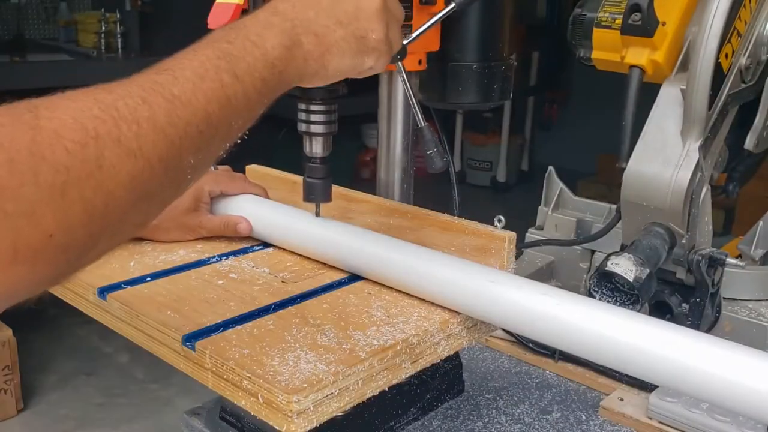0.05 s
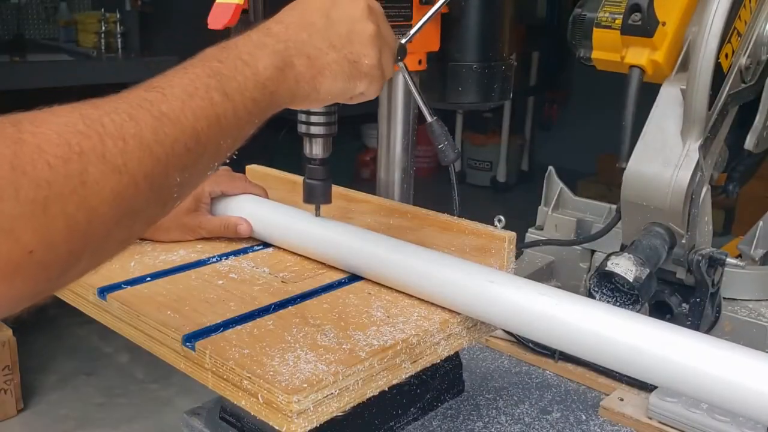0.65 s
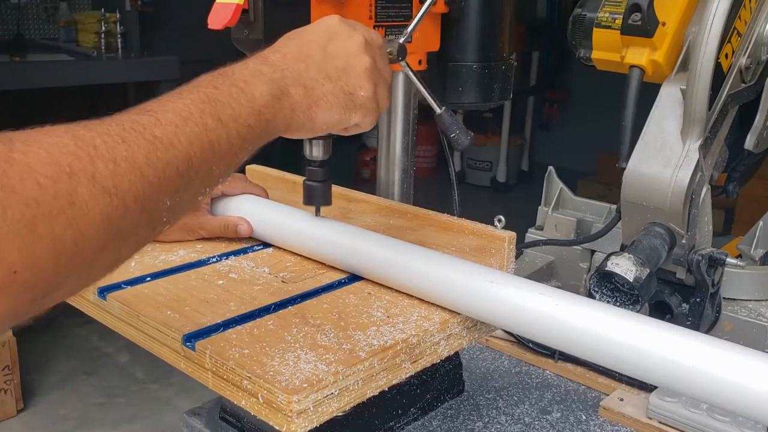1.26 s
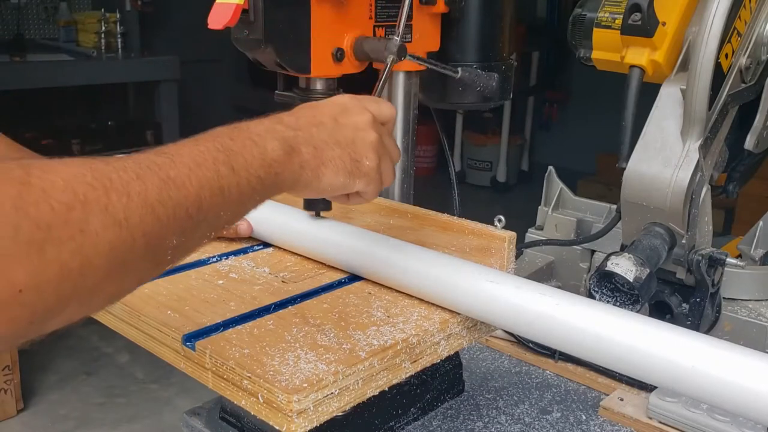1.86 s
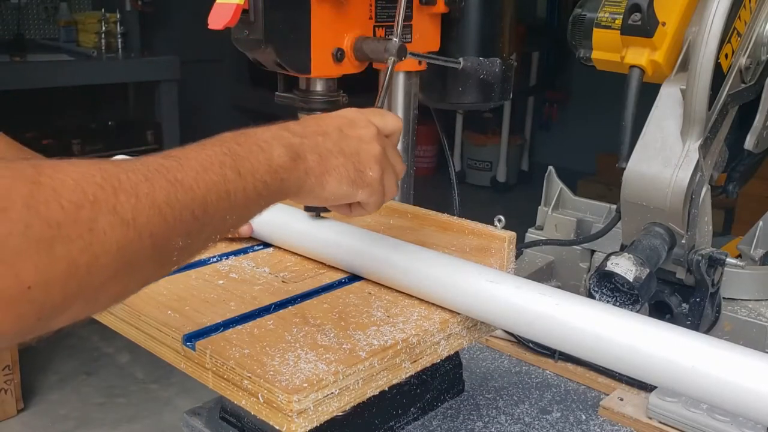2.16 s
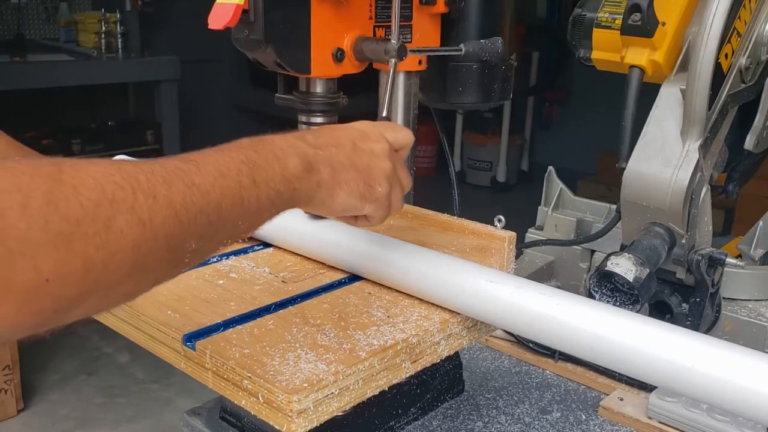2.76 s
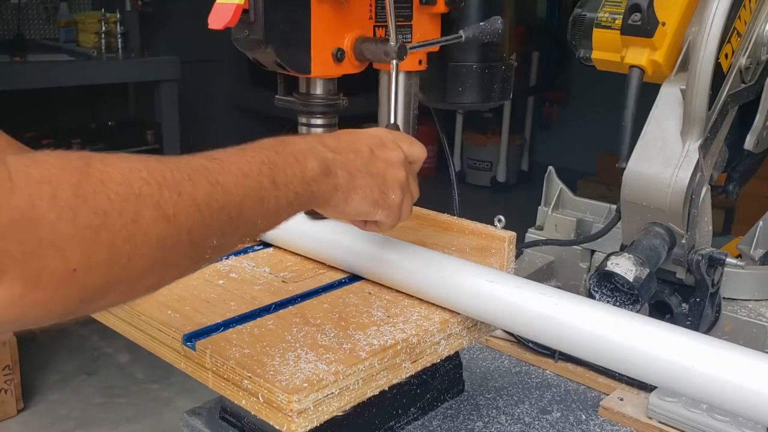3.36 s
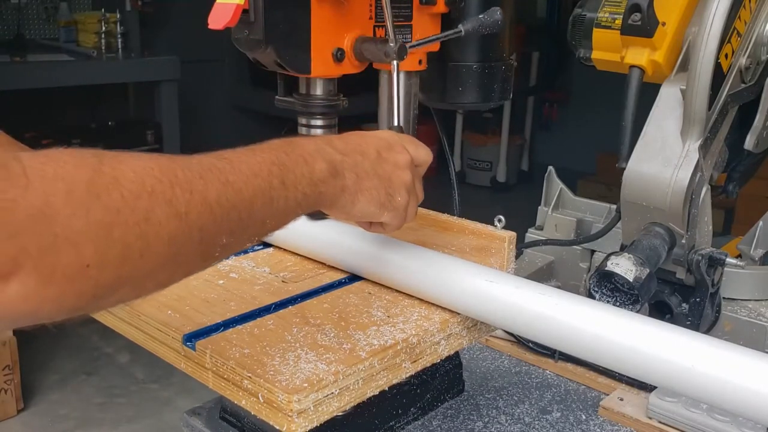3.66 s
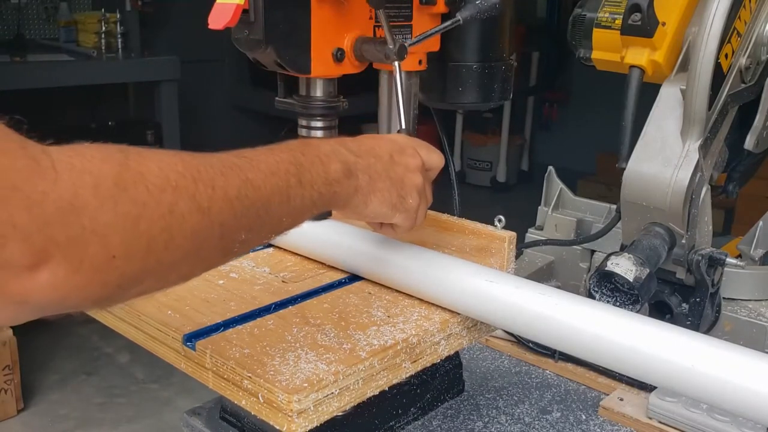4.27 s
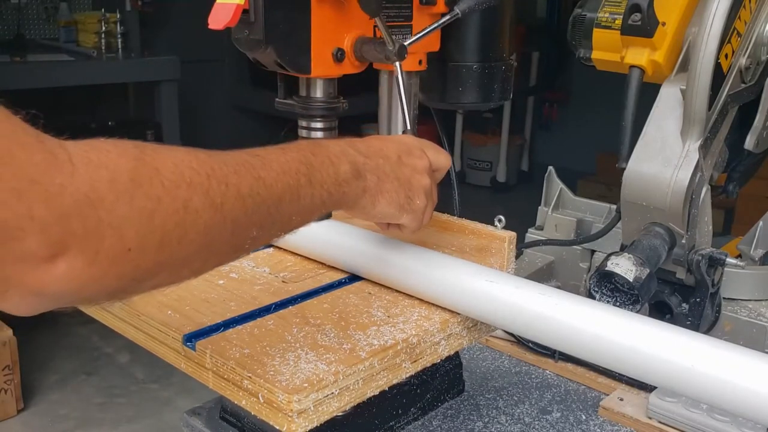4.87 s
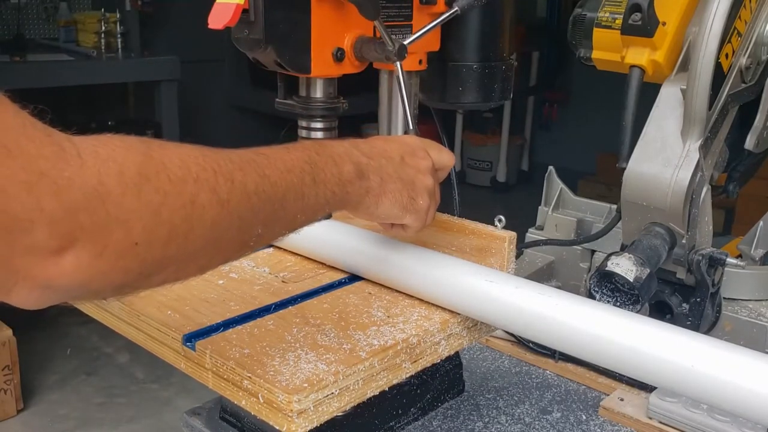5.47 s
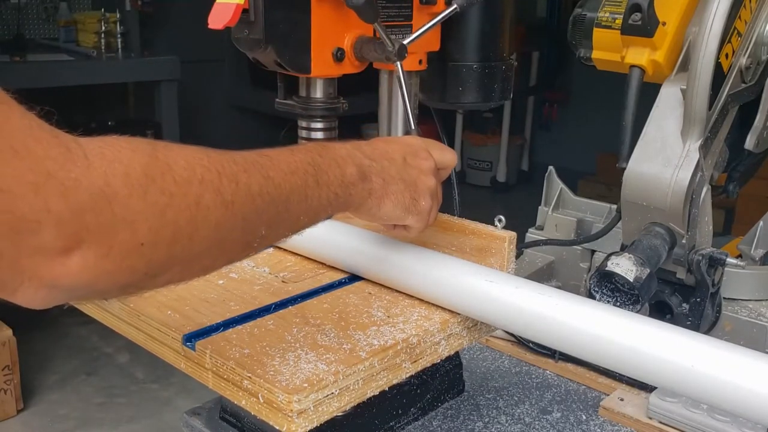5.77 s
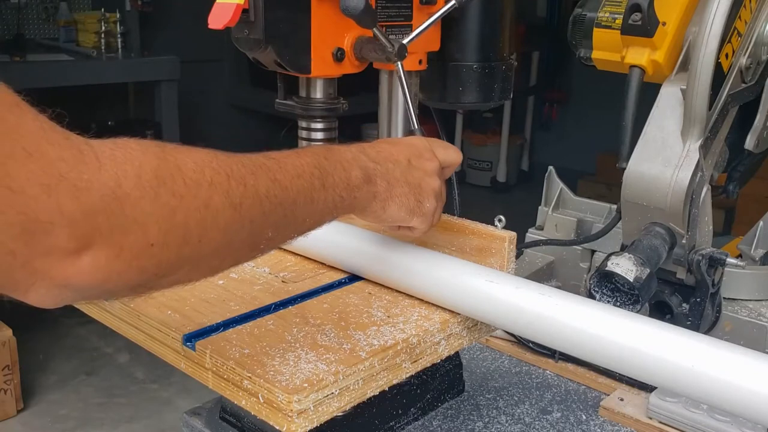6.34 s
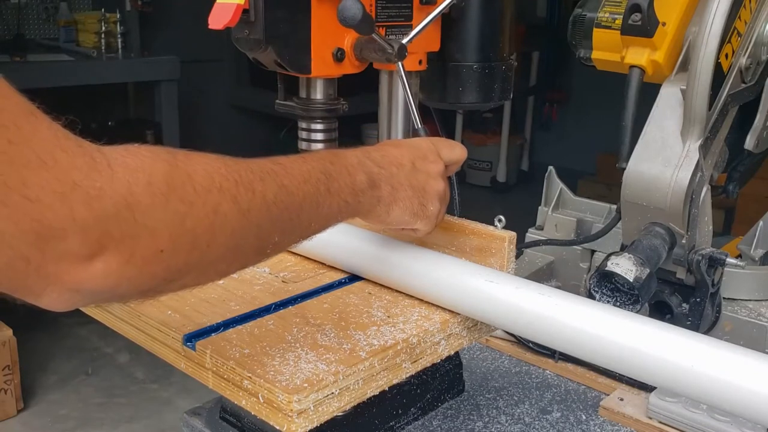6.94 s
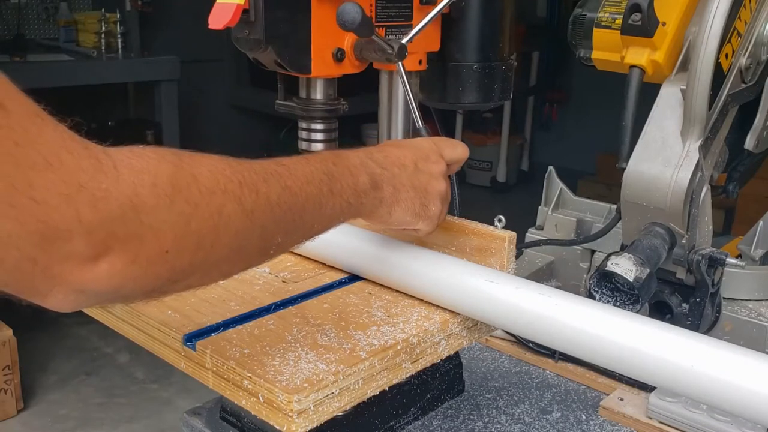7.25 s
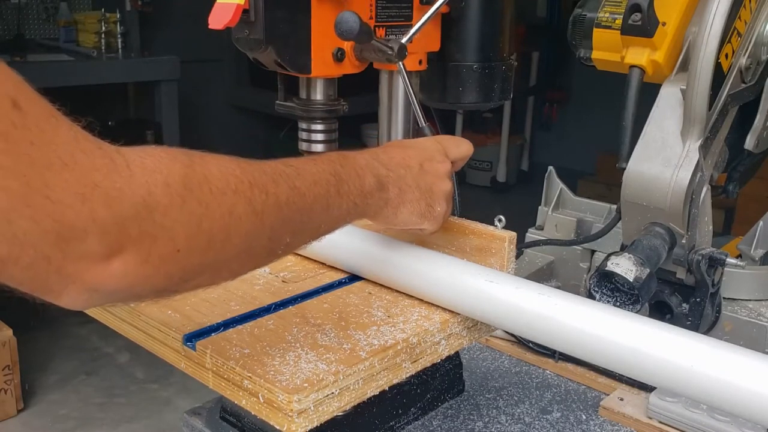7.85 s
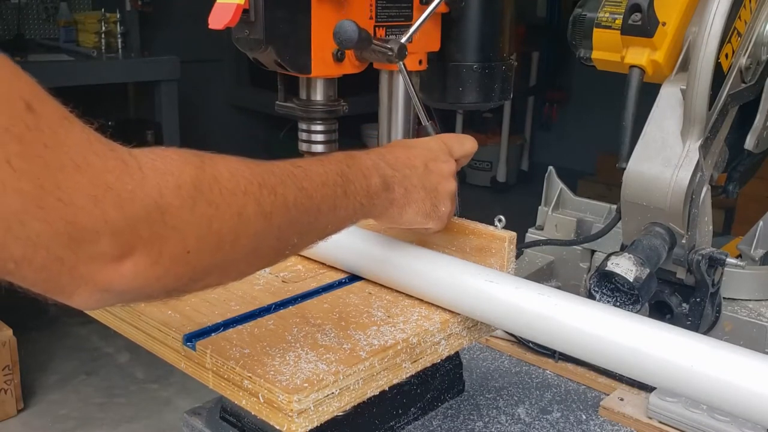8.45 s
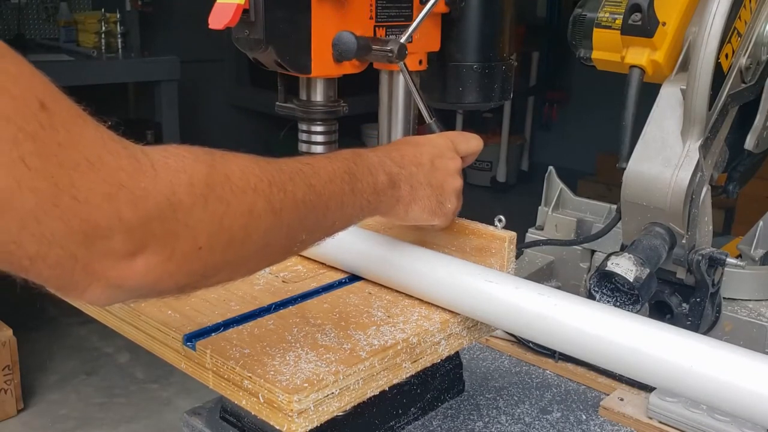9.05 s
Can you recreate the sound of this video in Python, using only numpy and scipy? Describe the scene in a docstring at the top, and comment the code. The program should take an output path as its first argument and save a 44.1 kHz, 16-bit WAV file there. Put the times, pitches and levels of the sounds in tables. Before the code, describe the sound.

A drill press hums and rattles, then a hole saw bites into plastic pipe with a loud, hollow, ringing rasp.

```python
"""Drill press and hole saw on plastic pipe.

A belt-driven drill press hums and throbs in a small workshop. Torque pulses rattle the quill as it
is fed down, and the splines tick as the spindle extends. Then a hole saw bites into a plastic pipe:
its teeth chip the wall turn after turn, the pipe resounds and the steel cup rings."""
import sys
import numpy as np
from scipy import signal
from scipy.fft import rfft, irfft, next_fast_len
from scipy.io import wavfile
from scipy.ndimage import uniform_filter1d, map_coordinates

SR = 44100
rng = np.random.default_rng(int(sys.argv[2]) if len(sys.argv) > 2 else 0)


def digitize_waveform(pressure):
    """Quantize a signal to 16-bit integers and store it at the path in sys.argv[1].

    Rows of a 2-D input are taken as channels; values are limited to [-1, 1].
    """
    field = np.atleast_2d(pressure).T
    bounded = np.clip(field, -1, 1)
    quanta = np.round(bounded * 32767).astype(np.int16)
    wavfile.write(sys.argv[1], SR, quanta)


N = 401751
TIME = np.arange(N) / SR
PULSE_HZ = 119.985  # motor torque pulses
EXTEND_S = 1.43  # spindle starts to extend
TOUCH_S, CLAMP_ATTACK_S = 4.504, 0.58  # saw lands, clamping the frame
DEEPEN_S, DEEPEN_LENGTH_S = 6.2, 2.16  # deepening kerf loads the drive


# uneven teeth: place/turns, then level/dB of wall thump, cup ring, shallow chip, deep chip, scoring
TEETH = [(0.025, -2.0, -18.0, -7.0, -4.0, -11.0), (0.1, -8.0, -11.0, -10.0, -4.0, -10.0),
         (0.205, -7.0, -1.0, -4.0, -6.0, -0.0), (0.23, -10.0, -7.0, -5.0, -4.0, -2.0),
         (0.28, -6.0, -7.0, -7.0, -4.0, -11.0), (0.355, -10.0, -4.0, -10.0, -4.0, -10.0),
         (0.445, -5.0, -1.0, -3.0, -3.0, -6.0), (0.47, -18.0, -1.0, 0.0, -6.0, -1.0),
         (0.485, 0.0, -18.0, -18.0, -5.0, -18.0), (0.56, -10.0, -12.0, -5.0, -4.0, -9.0),
         (0.705, -6.0, -1.0, -1.0, -1.0, 0.0), (0.77, -14.0, -2.0, -4.0, -2.0, -6.0),
         (0.84, -16.0, -11.0, -9.0, 0.0, -17.0), (0.93, -1.0, -2.0, -4.0, -2.0, -2.0),
         (0.975, -18.0, 0.0, -0.0, -3.0, -9.0), (0.99, -12.0, -1.0, -10.0, -4.0, -9.0)]
# chip spectra, shallow and deep kerf: f/Hz, level/dB
CHIPS_SHALLOW = [(100, -33), (1500, -10), (2500, -2), (3200, 0.5), (5000, 3.5), (6500, 1.5), (8000, 1.5),
                 (9000, 8), (10500, -4.5), (11400, -4), (13000, -27), (15800, -13)]
CHIPS_DEEP = [(100, -35), (1500, 0), (2500, -2.5), (3200, -14.5), (5000, -2), (6500, 0), (8000, 2),
              (9000, 6), (10500, -4.5), (11400, -1), (13000, -25), (15800, -8)]
# tooth-point spectrum: f/Hz, level/dB
SCRATCH = [(4000, -29), (7500, -9), (8500, 17), (9500, 4), (11000, 9), (12500, -3), (13700, 0), (15800, 6)]
# singing mode of the cup: f/Hz, width/Hz, level/dB
CUP_NOTE = [(9566, 55, 0)]
# cup rubbing in the kerf: t/s, level/dB
BIND = [(8.25, -44), (8.42, -33), (8.63, -29), (8.69, -69), (8.8, -37), (8.93, -36), (9.11, -34)]
# modes of the rubbed cup: f/Hz, width/Hz, level/dB
SHRILL_MODES = [(4130, 130, -9), (4600, 300, -13), (8470, 110, -1), (8860, 140, 0), (9250, 220, -6),
                (9600, 200, -5), (11400, 500, -12)]

def hole_saw(chip_db=-30, steel_db=-32, sing_db=-41, score_db=-33, bind_db=0.5, score_decay_s=0.43):
    """Each tooth snaps off a chip and tears on briefly, ringing the saw's steel cup."""
    deep = ramp(6.06, 0.9)
    _, _, cup_db, shallow_db, deep_db, point_db = np.transpose(TEETH)
    chips = np.sqrt(1 - deep) * coloured(scrape(shallow_db, drag=0.42), CHIPS_SHALLOW)
    chips += np.sqrt(deep) * coloured(scrape(deep_db, drag=0.84), CHIPS_DEEP)
    force = scrape(cup_db, drag=0.48)
    steel = amp(steel_db + deep - 3 * ramp(7.6, 0.98)) * cup_ring(force, deep)
    rasp = ramp(4.5, 0.59) * (amp(chip_db - 2.5 * deep) * chips + steel)
    # the cup sings until the kerf walls hold it
    singing = ramp(TOUCH_S, CLAMP_ATTACK_S) * amp(sing_db - 9 * deep + wobble(6.9))
    note = singing * resonate(force, CUP_NOTE)
    scoring = ramp(4.68, 0.09) * np.exp(-np.maximum(TIME - 4.815, 0) / score_decay_s)
    scratch = amp(score_db) * scoring * coloured(scrape(point_db, drag=0.1, life_s=0.001), SCRATCH)
    binding = during(BIND) * amp(bind_db + curves(BIND)[0])
    shrill = binding * resonate(scrape(deep_db, drag=0.45), SHRILL_MODES)
    return rasp + note + scratch + shrill


# cup modes by kerf depth: shallow f/Hz, deep f/Hz, width/Hz, shallow level/dB, deep level/dB
CUP_MODES = [(3310, 3310, 60, -8, -24), (3760, 3770, 100, -2, -11), (3988, 3983, 130, -1, -6),
             (4140, 4170, 170, -6, 0), (4560, 4560, 230, -9, -2), (4705, 4760, 120, 0, -5),
             (5480, 5420, 170, -14, -12), (7080, 7060, 120, -14, -8), (8590, 8530, 200, -5, 0),
             (8770, 8810, 170, -2, -7), (9560, 9600, 140, -20, -8), (11200, 11330, 250, -22, -12),
             (11980, 11980, 100, -15, -22)]

def cup_ring(force, depth, drift=0.11, drift_hz=5):
    """The steel's ring shifts as the kerf grips and frees it."""
    shallow_hz, deep_hz, width_hz, shallow_db, deep_db = np.transpose(CUP_MODES)
    grip = np.clip(depth + drift * wobble(drift_hz), 0, 1)
    free = resonate(force, zip(shallow_hz, width_hz, shallow_db))
    held = resonate(force, zip(deep_hz, width_hz, deep_db))
    return unit((1 - grip) * free + grip * held)


def scrape(bite_db, drag, life_s=0.0023):
    """Noise swells as each tooth sinks in, over the steady drag of the others."""
    tearing = dying(tooth_blows(bite_db, uneven_db=0.2), life_s)
    bites = unit(uniform_filter1d(tearing, size=SR // 700))
    return unit(np.hypot(bites, drag) * rng.standard_normal(N))


def tooth_blows(bite_db, uneven_db, scatter_turns=0.006):
    """One impulse per tooth per turn, scattered in place and strength."""
    turns = spindle_turns()
    place = np.arange(int(turns[-1]) + 1)[:, None] + np.transpose(TEETH)[0]
    place += scatter_turns * rng.standard_normal(place.shape)
    at = np.minimum(np.searchsorted(turns, place), N - 1)
    sizes = amp(bite_db + uneven_db * rng.standard_normal(at.shape))
    # the teeth of each turn share the feed force
    sizes = sizes / np.linalg.norm(sizes, axis=1, keepdims=True) * (at < N - 1)
    return np.bincount(at.ravel(), sizes.ravel(), N)


def spindle_turns(idle_hz=25.021, sag_from_s=4.91, sag_hz_per_s=0.094, max_sag_hz=0.315):
    """Running turn count; the speed sags under load."""
    return np.cumsum(idle_hz - np.clip(sag_hz_per_s * (TIME - sag_from_s), 0, max_sag_hz)) / SR


# pipe modes: whole f/Hz, cut f/Hz, width/Hz, then level/dB at first bite, grooved, nearly cut
WALL_MODES = [(384, 380, 45, -14, -12, -18), (489, 485, 47, -11, -7, -9), (548, 542, 53, -13, -15, -26),
              (720, 720, 70, -20, -10, -18), (855, 850, 110, -13, -14, -15), (1010, 1028, 55, -3, -3, -4),
              (1110, 1090, 80, -6, -9, -22), (1186, 1172, 50, -4, -7, -4), (1290, 1290, 70, -11, -13, -14),
              (1360, 1375, 48, -2, -4, -8), (1610, 1590, 60, -13, -8, -9), (1660, 1655, 45, -16, -15, -7),
              (1865, 1855, 55, -13, -15, -18), (2070, 2090, 70, -21, -22, -21),
              (2350, 2360, 70, -18, -21, -20)]
# wall sound under hand pressure: t/s, level/dB
PRESSURE = [(4.58, -26), (4.71, -26.5), (5.1, -28), (5.22, -27.5), (5.35, -29), (5.46, -28), (5.64, -27.5),
            (5.78, -29.5), (6.16, -29), (6.22, -27.5), (6.52, -27.5), (6.65, -29.5), (7.5, -30),
            (8.4, -32.5), (8.69, -31.5), (8.82, -32.5), (9.11, -31.5)]

def pipe_wall(pipe_db=0.5):
    """Teeth thump the hollow pipe: it howls at first, and its ring shifts as the wall thins."""
    press_db, = curves(PRESSURE)
    grooved, thin = ramp(5.05, 0.47), ramp(6.2, 1.95)
    blows = tooth_blows(np.transpose(TEETH)[1], uneven_db=-0.6, scatter_turns=0.009)
    tearing = unit(dying(blows, life_s=0.0014))
    force = 0.38 * unit(blows) + unit(np.hypot(tearing, 0.5) * grit(0.5))
    whole_hz, cut_hz, width_hz, first_db, grooved_db, cut_db = np.transpose(WALL_MODES)
    stages = [(1 - grooved, whole_hz, first_db),
              (grooved * (1 - thin), whole_hz, grooved_db),
              (thin, cut_hz, cut_db)]
    wall = sum(share * resonate(force, zip(hz, width_hz, db)) for share, hz, db in stages)
    wall /= np.sqrt(np.abs(uniform_filter1d(wall ** 2, SR // 8)) + 1e-9)  # pressure alone sets the level
    wall = coloured(wall, [(120, -35), (330, 2), (1000, -2), (1600, 0), (2400, -2.5), (6000, -21.5)])
    return ramp(TOUCH_S, 0.21) * amp(pipe_db + press_db) * wall


# teeth catching before the cut takes hold: t/s, scratch level/dB, knock level/dB
CATCHES = [(4.535, -47, -20), (4.559, -42, -22), (4.575, -46, -24), (4.594, -38, -29), (4.606, -22, -21),
           (4.616, -36, -14), (4.633, -32, -34), (4.645, -17, -13), (4.656, -29, -19), (4.666, -31, -31),
           (4.6855, -17, -16), (4.692, -20, -28), (4.694, -30, -16), (4.705, -25, -26), (4.766, -15, -11),
           (4.776, -27, -17), (4.786, -19, -26)]

def first_catches(scratch_db=-7, knock_db=-6, ping_db=-15):
    """Lone teeth nick the pipe: a bright scratch, a knock of the wall, a ping of the cup."""
    at_s, nick_db, blow_db = np.transpose(CATCHES)
    at = np.round(at_s * SR).astype(int)
    nicks, blows = np.bincount(at, amp(nick_db), N), np.bincount(at, amp(blow_db), N)
    hz, _, width_hz, db, _, _ = np.transpose(WALL_MODES)
    scratch = amp(scratch_db) * dying(nicks, life_s=0.0014) * coloured(grit(1), SCRATCH)
    knock = amp(knock_db) * dying(blows, life_s=0.0067) * resonate(grit(1), zip(hz, width_hz, db))
    knock = filtered(knock, lambda f: amp(along([(120, -38), (400, -3)], f)))
    ping = amp(ping_db) * dying(nicks, life_s=0.0059) * swing(CUP_NOTE[0][0] * TIME)
    return scratch + knock + ping


# chatter under hand feed: t/s, level/dB
FEED = [(0.372, -45), (0.664, -31), (0.82, -30), (0.94, -28), (1.1, -33), (1.44, -32.5), (1.566, -42.5),
        (1.682, -46.5), (1.9, -43)]
# quill modes and its clearest note: f/Hz, width/Hz, level/dB
QUILL_MODES = [(370, 150, -5), (700, 120, -8), (1020, 80, -12), (1130, 60, -6.5), (1260, 90, -8),
               (1455, 55, -2), (1575, 60, 0), (1690, 100, -10), (1805, 60, 2), (1950, 100, -5),
               (2100, 130, -3), (2250, 80, -9), (2460, 90, -9), (2650, 120, -14), (3320, 120, -17)]
QUILL_NOTE = [(1555, 35, 0)]
# quill sizzle spectrum: f/Hz, level/dB
SIZZLE = [(1530, -13), (2600, -33), (3310, -3), (3590, -23), (3980, -9.5), (5100, -16.5), (6040, -6.5),
          (7750, -13), (8530, -8.5), (11000, -28), (13100, -28), (15000, -48)]

def quill(sizzle_db=-12, note_db=-40, ring_gate_db=3, hiss_gate_db=9):
    """Each torque pulse shakes the sliding quill in its bore."""
    feed_db, = curves(FEED)
    shake = 1 - 2 * (PULSE_HZ * TIME % 1)
    size = amp(1.95 * wobble(110))
    knocks = unit(size * (np.diff(shake, prepend=1) > 1))  # one hard contact per pulse
    rubbing = unit(grit(0.6) * size * amp(ring_gate_db * shake))
    ring = resonate(rubbing + 0.15 * knocks, QUILL_MODES)
    ring = coloured(ring, [(150, 1), (350, 2), (1100, 5), (2200, -1.5), (3200, -14.5), (6000, -28)])
    hiss = coloured(grit(3) * size * amp(hiss_gate_db * shake), SIZZLE)
    note_gain = amp(note_db + 0.3 * (feed_db - feed_db.max())) * (1 - ramp(EXTEND_S, 0.08))
    note = note_gain * resonate(grit(0.91), QUILL_NOTE)
    return during(FEED) * (amp(feed_db) * (ring + amp(sizzle_db) * hiss) + note)


# spline tick spectrum: f/Hz, level/dB
TICK = [(2400, -31), (3000, -51), (3300, 10), (3650, -7), (5000, -4), (5500, 11), (6100, 4.5), (6800, 6),
        (7600, -1.5), (8500, 3), (11000, -20), (12500, -26), (14200, -14), (15500, -33)]

def splines(play_hz=64.085, ring_db=-47, tick_db=-57, growth_db=7.5, width_hz=640, fade_s=0.04):
    """Torque pulses and spindle play drift in and out of step, knocking the splines."""
    extension = ramp(EXTEND_S, 3.2)
    play, pulse = play_hz * TIME, PULSE_HZ * TIME
    in_step = swing(2 * play - pulse)
    slack = (swing(play) + swing(pulse - play)) / 2
    knocks = amp(7 * swing(pulse) + 7 * slack + 2 * in_step + wobble(60))
    ring = 0
    # one broad resonance climbs as the spindle extends
    for stage, hz in enumerate(np.linspace(2000, 2620, 4)):
        mode = [(hz, width_hz, 0)]
        share = np.clip(1 - np.abs(3 * extension - stage), 0, 1)
        rubbing = grit(0.5) * knocks ** 0.4 * amp(2.2 * in_step)
        ring += np.sqrt(share) * resonate(resonate(rubbing, mode), mode)
    ticks = coloured(grit(0.5) * knocks, TICK)
    loose = ramp(EXTEND_S, fade_s) - ramp(TOUCH_S + fade_s, fade_s)  # the cut takes up the play
    return loose * (amp(ring_db) * ring + amp(tick_db + growth_db * extension) * ticks)


# belt and pulley drone: f/Hz, level/dB re hum
BELT = [(160.0, -27), (191.9, -27), (223.95, -23), (231.7, -23), (255.92, -8.5), (271.87, -24),
        (351.0, -24), (459.3, -17), (482.6, -23), (502.8, -24)]
# magnetic buzz: multiple of PULSE_HZ, level/dB
MAINS = [(3, -20), (4, -12.5), (5, -22), (6, -16.5), (7, -14), (9, -21.5)]
# motor whine: shaft order, level/dB
WHINE = [(13, -51), (14, -72), (17, -54), (28, -52), (29, -45), (30, -40.5), (31, -61), (34, -75)]
# pulley and bearing spectrum: f/Hz, level/dB
RUMBLE = [(20, -50), (50, -14.5), (100, -16), (200, -8), (295, -7), (360, -2.5), (490, -1.5), (580, -8),
          (860, -3.5), (1150, -9), (1500, -10.5), (1750, -16.5), (2400, -25), (8500, -35), (15000, -57)]

def motor(buzz_db=-34, pulse_db=-52, rumble_db=-39, whine_load_db=-9, pulley_ratio=0.8444):
    """Mains hum and belt drone beat together over shaft whine and pulley rumble."""
    turns = spindle_turns() / pulley_ratio
    slip_hz = 0.014 + 0.3 * ramp(DEEPEN_S, DEEPEN_LENGTH_S)  # the belt lags more under load
    slip = np.cumsum(slip_hz) / SR
    drone = sum(amp(db) * swing(hz * TIME - slip + 0.06 * wobble(3.6)) for hz, db in BELT)
    buzz = sum(amp(db) * swing(k * PULSE_HZ * TIME + rng.random() + 0.12 * wobble(9.2))
               for k, db in MAINS)
    hum = amp(hum_level_db()) * (swing(2 * PULSE_HZ * TIME) + drone)
    pulse = amp(pulse_db + wobble(4.3)) * swing(PULSE_HZ * TIME)
    whine = sum(amp(db + wobble(5.9)) * swing(k * turns + rng.random() + 0.025 * wobble(21))
                for k, db in WHINE)
    whine *= amp(whine_load_db * ramp(TOUCH_S, CLAMP_ATTACK_S))
    rumble = coloured(grit(0.43) * amp(swing(turns)), RUMBLE)
    return np.sqrt(2) * (hum + amp(buzz_db) * buzz + pulse + whine) + amp(rumble_db) * rumble


def hum_level_db(idle_db=-33.5, parked_db=2, feed_db=-7, clamp_db=-7, hold_s=0.91, late_db_per_s=-2.5):
    """Feeding and the first bite damp the frame's hum; it fades in the deep kerf."""
    chatter_db, = curves(FEED)
    effort = amp(chatter_db - chatter_db.max()) * during(FEED)
    parked = 1 - ramp(FEED[0][0], 0.25)
    clamp = ramp(TOUCH_S, CLAMP_ATTACK_S) - ramp(TOUCH_S + CLAMP_ATTACK_S + hold_s, 0.37)
    bite_db = clamp * (clamp_db + 2.5 * wobble(11))
    late_s = np.maximum(TIME - DEEPEN_S - DEEPEN_LENGTH_S, 0)
    return idle_db + parked_db * parked + feed_db * effort + bite_db + late_db_per_s * late_s


# room decay: f/Hz, t60/s
ROOM = [(200, 0.054), (2000, 0.6), (12000, 0.075)]

def workshop(x):
    """The cluttered room answers briefly, longest in the midrange."""
    hz, t, noise = signal.stft(rng.standard_normal(SR // 2), SR, nperseg=256)
    _, tail = signal.istft(noise * amp(-60 * t / along(ROOM, hz)[:, None]), SR, nperseg=256)
    response = np.pad(tail / np.linalg.norm(tail), (SR // 250, 0))
    return signal.fftconvolve(x, response)[:N]


def amp(db):
    """Decibels to gain."""
    return 10 ** (np.asarray(db) / 20)


def unit(x):
    """Scaled to rms 1."""
    return x / np.sqrt(np.mean(x ** 2) + 1e-20)


def swing(turns):
    """One cosine cycle per turn."""
    return np.cos(2 * np.pi * turns)


def ramp(start_s, length_s):
    """Linear rise from 0 to 1."""
    return np.clip((TIME - start_s) / length_s, 0, 1)


def along(points, hz):
    """(f/Hz, value) points interpolated on a log axis."""
    f, values = np.transpose(points)
    return np.interp(np.log(hz + 1), np.log(f + 1), values)


def curves(rows):
    """One value per sample for each column after t/s."""
    times_s, *columns = np.transpose(rows)
    return [np.interp(TIME, times_s, column) for column in columns]


def during(rows, fade_s=0.016):
    """1 while a table lasts, fading to 0 outside it."""
    return np.clip(1 + np.minimum(TIME - rows[0][0], rows[-1][0] - TIME) / fade_s, 0, 1)


def wobble(rate_hz):
    """Smooth random curve, rate_hz knots a second."""
    return map_coordinates(rng.standard_normal(int(N * rate_hz / SR) + 4), [TIME * rate_hz])


def grit(spiky_db):
    """Noise whose tiny grains differ in size."""
    return unit(rng.standard_normal(N) * amp(spiky_db * wobble(SR / 16)))


def dying(blows, life_s):
    """Exponential decay after each blow."""
    return signal.lfilter([1], [1, -np.exp(-1 / (life_s * SR))], blows)


def filtered(x, response):
    """x through a complex frequency response."""
    size = next_fast_len(N + SR // 2)
    return irfft(rfft(x, size) * response(np.fft.rfftfreq(size, 1 / SR)), size)[:N]


def coloured(x, spectrum):
    """x shaped by (f/Hz, level/dB) points, at rms 1."""
    return unit(filtered(x, lambda f: amp(along(spectrum, f))))


def resonate(x, modes):
    """x through (f/Hz, width/Hz, level/dB) resonances, at rms 1."""
    def response(f):
        return sum(amp(db) * 1j * f * width / (hz * hz - f * f + 1j * f * width)
                   for hz, width, db in modes)
    return unit(filtered(x, response))


def scene(room_db=-11):
    """Rattle and cut with their room sound, over the dry motor; mono."""
    work = quill() + splines() + first_catches() + pipe_wall() + hole_saw()
    return (motor() + work + amp(room_db) * workshop(work))[None]


def record(dry, top_hz=15800):
    """Brick-wall low-pass."""
    return np.array([filtered(x, lambda f: f < top_hz) for x in dry])


dry = scene()
out = record(dry)
digitize_waveform(out)
```